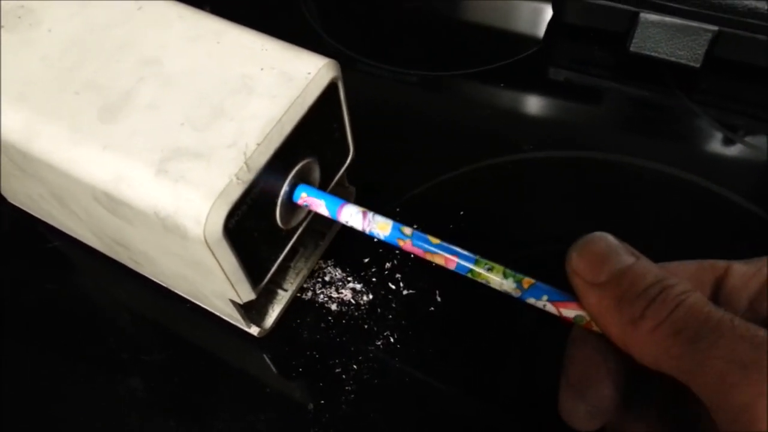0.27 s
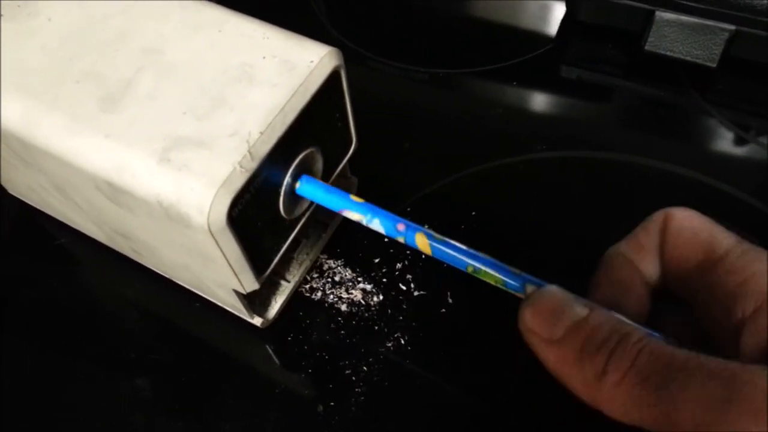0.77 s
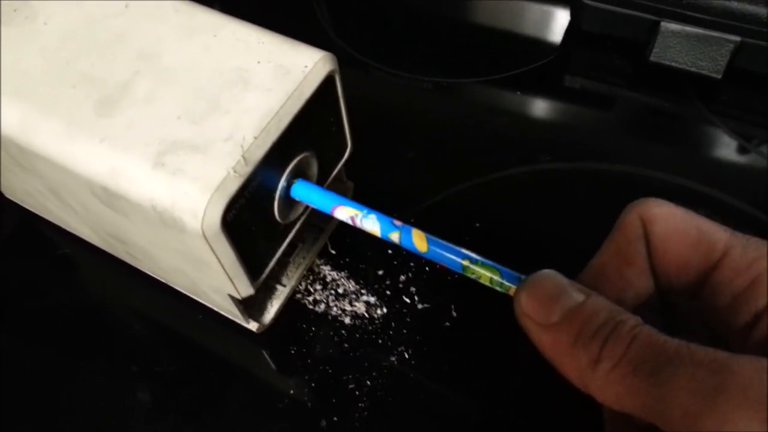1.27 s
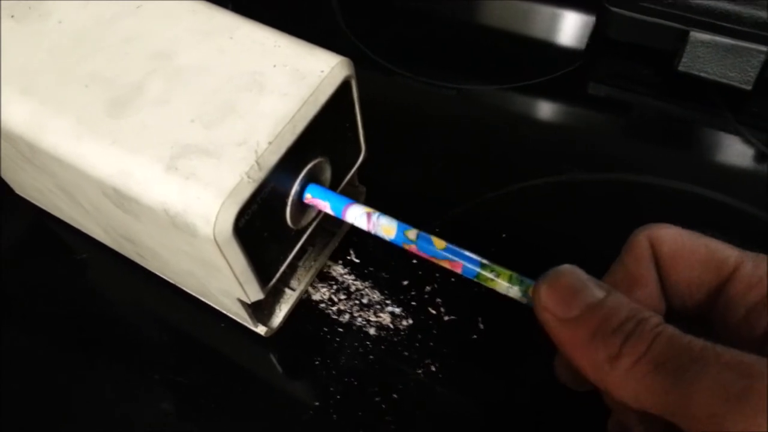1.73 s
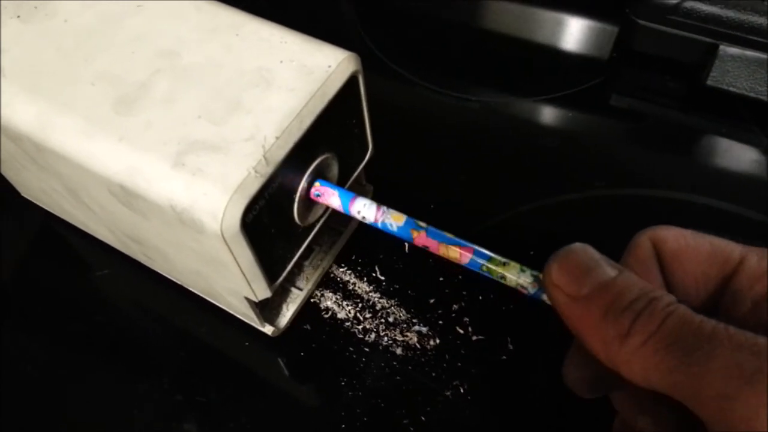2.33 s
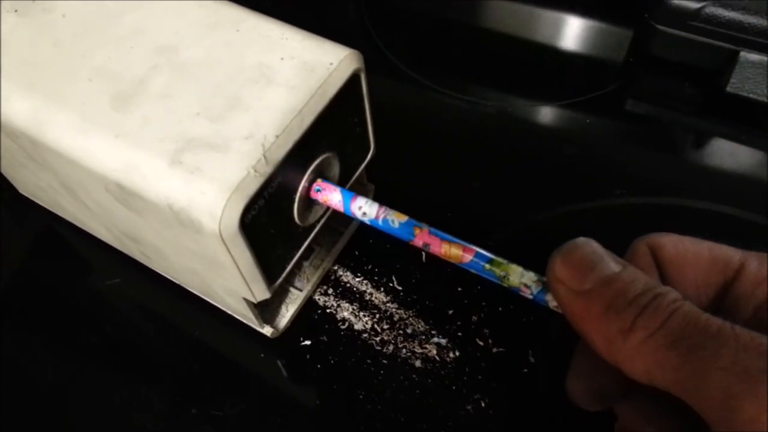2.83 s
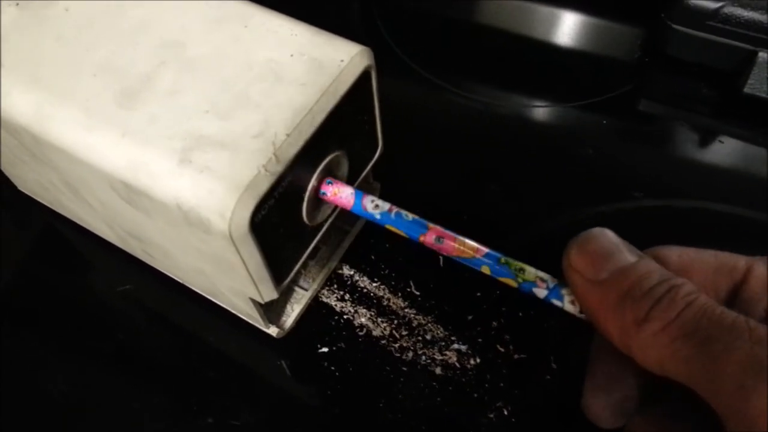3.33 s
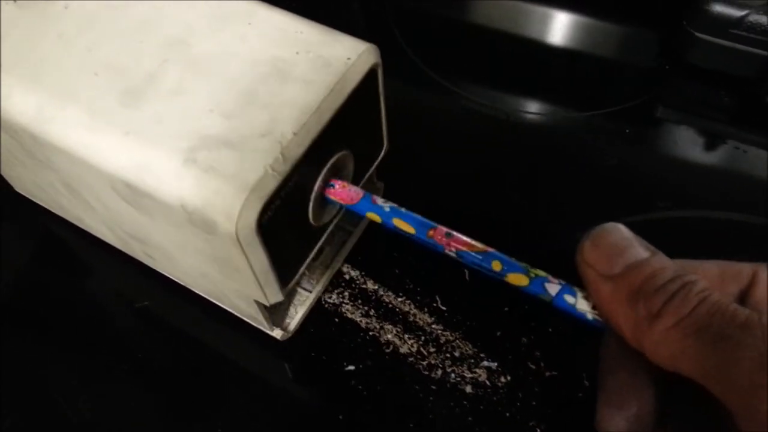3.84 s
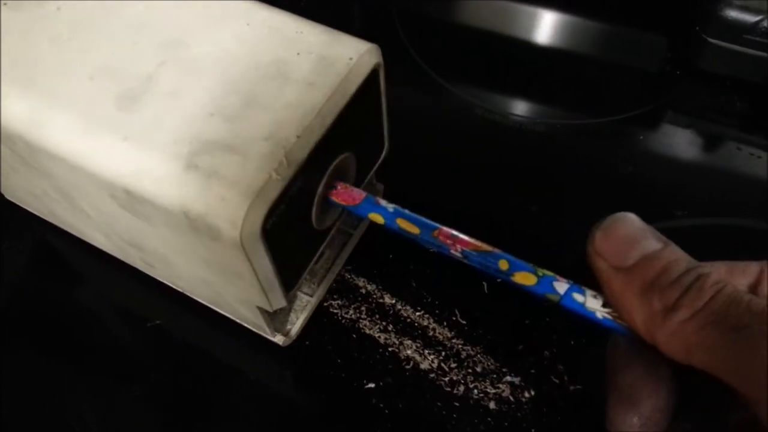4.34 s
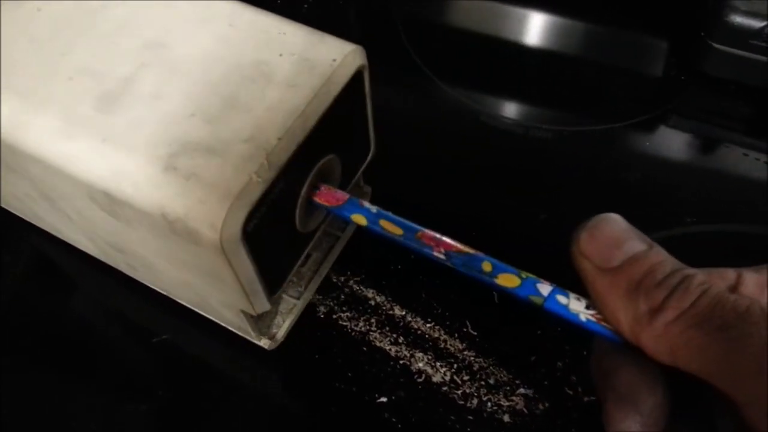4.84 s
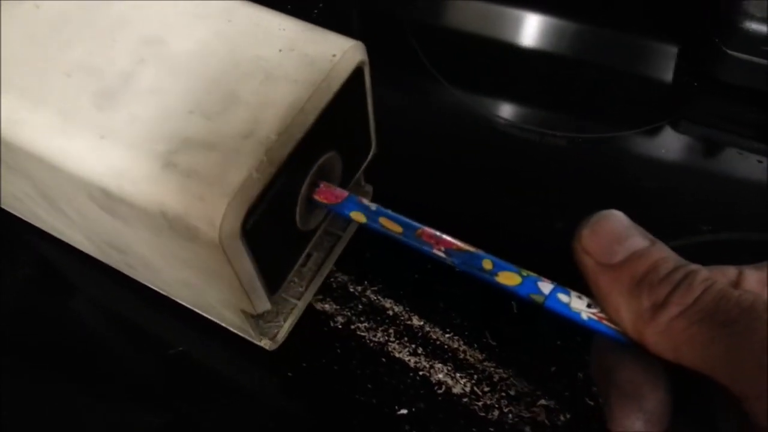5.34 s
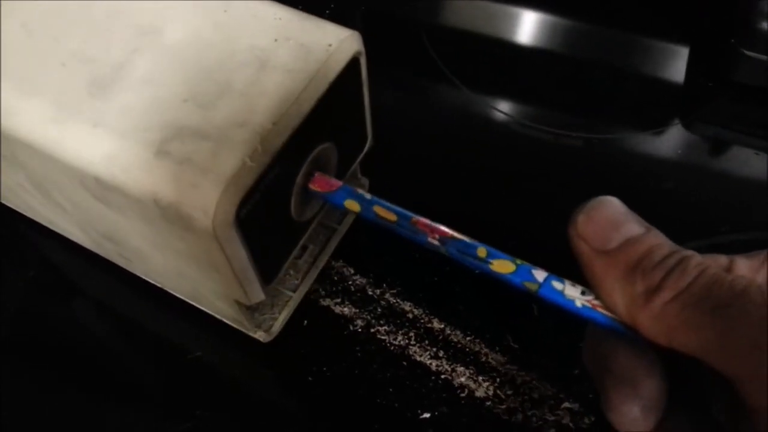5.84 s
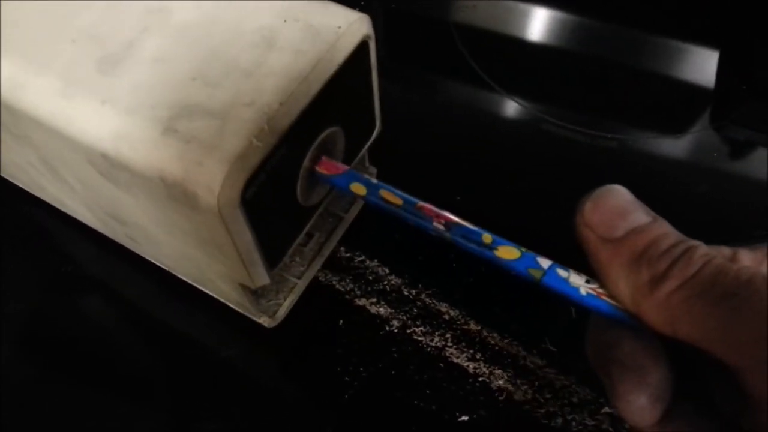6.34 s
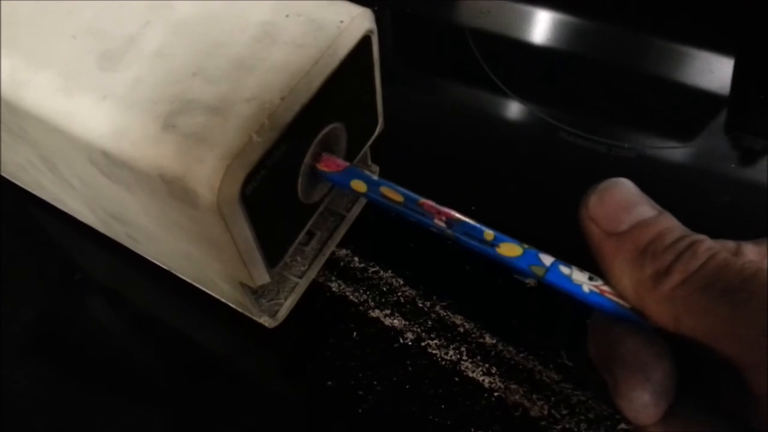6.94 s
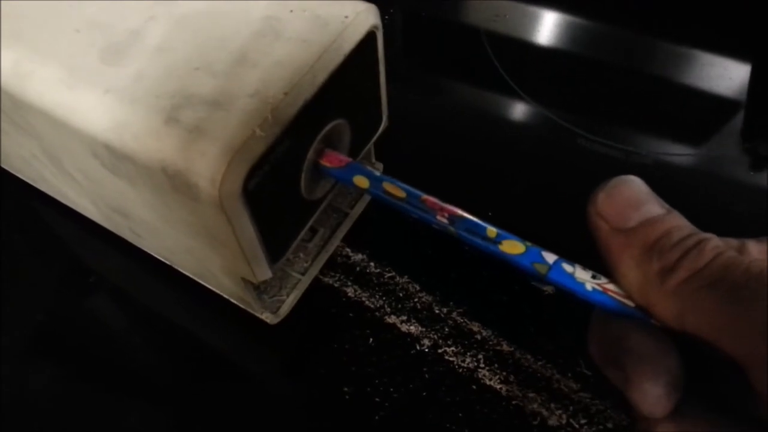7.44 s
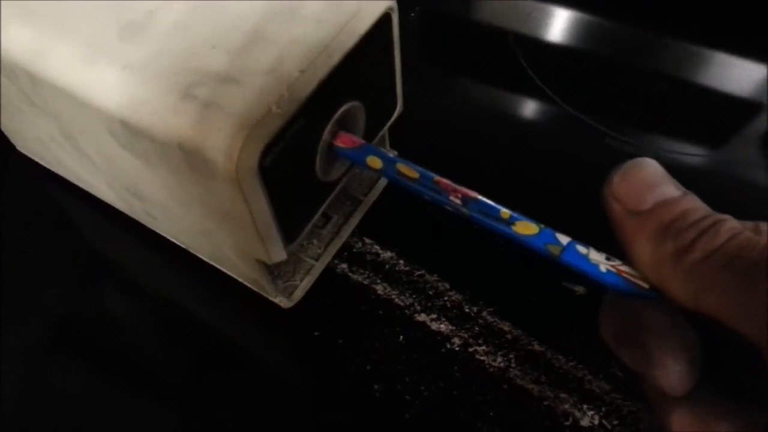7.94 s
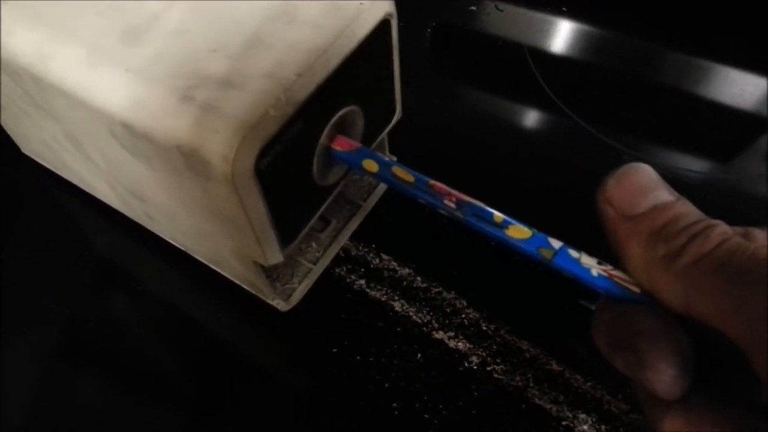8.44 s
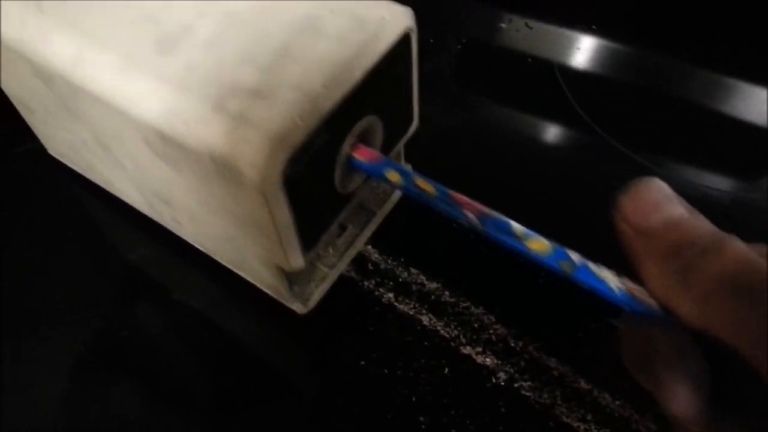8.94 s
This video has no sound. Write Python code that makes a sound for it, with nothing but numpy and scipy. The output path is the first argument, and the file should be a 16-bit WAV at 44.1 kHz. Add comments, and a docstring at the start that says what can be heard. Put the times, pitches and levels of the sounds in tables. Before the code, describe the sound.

An electric pencil sharpener grinds a pencil on a counter top, close to a stereo microphone, for a little over nine seconds. It is running from the start, its cutter pulsing about eight times a second. The blades shave the wood with a grainy, hissing rasp and a thin steel ring, while gear knocks make the plastic case drone and growl over a very faint motor hum. Blades catch harder now and then, notably around 1.5 and 2.3 seconds and repeatedly between 6 and 8.5 seconds. Rubbing parts add wavering, throbbing tones: lower chatter between about 2 and 5 seconds, a higher one from about 3 to 7, and a faint, thin squeal from 7 to 9. At about 9 seconds the pencil is drawn back and gives a short, bright scrape against the metal guide while the machine still turns.

```python
"""An electric pencil sharpener on a counter top, close to a stereo microphone, a pencil held in it.
From the start the cutter goes round eight times a second: the blades bite, rasp along the wood and let
go, while gear knocks and grinding ring the plastic case over a faint motor hum. As it runs on, a blade
now and then catches harder and rubbing parts chatter in short tones. At about nine seconds the pencil
is drawn back and scrapes the guide."""
import sys
import numpy as np
from scipy import signal
from scipy.fft import rfft, irfft, next_fast_len
from scipy.io import wavfile

SR = 44100
rng = np.random.default_rng(int(sys.argv[2]) if len(sys.argv) > 2 else 0)


def dump(signal):
    """Clip the signal to [-1, 1] and save it as 16-bit WAV at the path in sys.argv[1]."""
    limited = np.clip(np.atleast_2d(signal).T, -1, 1)
    pcm = np.round(limited * 32767).astype(np.int16)
    wavfile.write(sys.argv[1], SR, pcm)


N = 405719
TIME = np.arange(N) / SR


def plastic_case(turns, knocks, drive_db, feed_db, grind_db):
    """Gear knocks and grinding ring the case in four registers: boom, drone, growl and crunch."""
    # case resonances, low to high: f/Hz, width/Hz, level/dB, left-right/dB, change/(dB/s),
    # swing over a turn/dB, loudest point/turns
    boom = [(158.6, 36, -44, 0, 0.78, -0.7, 0.4), (230.5, 15.45, -50.5, -13, 2.5, -2, 0.14),
            (274.8, 28, -29, -1.5, 0.2, 0.5, 0.97), (301, 28, -38, 1.2, -1.0, -3.3, 0),
            (345.4, 71, -33, -2.5, 0.9, 2.4, 0.76), (447, 103, -36.5, 12, 1.16, 0.7, 0.5)]
    drone = [(553, 46, -24.5, -5, -0.42, 0.44, 0.33), (570.7, 96, -20, -7.5, 0.34, 0.54, 0.1),
             (641.5, 74, -26, 0.5, 0.14, 1.3, 0.1)]
    growl = [(699, 82, -24.5, 1, -1.14, 2.4, 0.17), (783, 75, -18.5, -4, -0.32, 1.4, 0.69),
             (851.6, 46.4, -19, -2, -0.06, 0.74, 0.17), (943.5, 51, -23, -5, 0.57, 2.3, 0.16),
             (1014.4, 45, -20.5, 0, 0.21, 0.96, 0.95), (1061, 45, -26.5, 6.5, 0.032, 2.1, 0.49)]
    crunch = [(1249, 170, -22.5, -6.5, 0.63, 0.2, 0.81), (1309, 68, -29, -13.5, -0.54, 0.2, 0.87),
              (1430, 109, -21.5, -13.5, 0.45, 1, 1), (1571, 57, -25, 3, -0.15, 1.0, 0.57),
              (1682, 184, -24.5, -15, 0.054, 0.37, 0.4), (1781, 86, -26.5, -2.5, -0.35, 0.94, 0.14),
              (1884, 174, -28, 1, -0.027, 0.33, 0.28), (2082, 194, -33.5, 2, -0.32, 0.32, 0.51)]
    # slow swells of the two low registers: t/s, level/dB
    boom_level = [(0.0, 4.5), (0.4, 4), (0.8, 4.5), (3.1, 1.8), (4.1, 0), (4.5, 1), (5.7, 3), (6.3, -1.5),
                  (7.0, 2.5), (7.6, -1), (8.0, 1.5), (8.4, -1), (8.8, -0.5), (9.2, -4.5)]
    drone_level = [(0.0, 1.5), (0.4, -1), (3.4, -1.8), (3.8, 2.7), (4.2, -0.2), (5.1, 0.5), (5.8, -2.3),
                   (7.8, 1.5), (8.2, -0.5), (8.6, 5.5), (9.2, -1.5)]
    boom_db, drone_db, growl_db, crunch_db = drive_db
    fade_db = -0.09 * (TIME - TIME[-1] / 2)   # less growl as the point takes shape
    growl_db = growl_db + 0.2 * feed_db + fade_db + grind_db
    crunch_db = crunch_db + 0.085 * feed_db + grind_db
    case = from_db(boom_db + swell(boom_level)) * ringing(boom, turns, knocks, knock_share=0.21)
    case += from_db(drone_db + swell(drone_level)) * ringing(drone, turns, knocks, knock_share=0.26)
    case += from_db(growl_db) * ringing(growl, turns, knocks, knock_share=0.22)
    case += from_db(crunch_db) * ringing(crunch, turns, knocks, knock_share=0.39)
    return case


def blade_strokes(turns):
    """Each turn the blades run free, then bite three times: dB of boom, drone, growl, crunch, rasp."""
    # the three bites: start/turns, rise/turns, then lift/dB of boom, drone, growl, crunch, rasp
    strokes = [(0.143, 0.084, 4, 4, -0.5, 6, 5.5), (.47, 0.085, 3.5, 5.5, 2.5, 1.1, -0.4),
               (.77, .13, 5.5, 2.5, 0.5, 2.5, 2.5)]
    idle_db = (-4, -4.5, -0.83, -2.42, -1.48)   # between strokes
    free_db, free_at_turn, free_width_turns = (-7, -5, -5, -5, -3), 0.11, 0.038
    grain_spread_db = (1.5, 1.15, 0.26, 0.26, 0.32)   # the wood's grain makes every turn different
    count = int(turns[-1]) + 2
    free_turn, free_phase = np.divmod(turns - free_at_turn + .5, 1)
    free = np.exp(-((free_phase - .5) / free_width_turns) ** 2)
    depth = 1 + 0.37 * rng.standard_normal(count)
    jolts = np.outer(free_db, depth[free_turn.astype(int)] * free)
    for start, rise, *lifts_db in strokes:
        turn, phase = np.divmod(turns - start, 1)
        age = phase / rise
        strength = 1 + 0.11 * rng.standard_normal(count)
        jolts += np.outer(lifts_db, strength[turn.astype(int)] * age * np.exp(1 - age))
    bluntness = 0.14 * np.exp(-TIME / 0.6)   # a pencil jolts more while it is blunt
    jolts += bluntness * (jolts - jolts.mean(axis=1, keepdims=True))
    base_db = rng.standard_normal((count, len(idle_db))) * grain_spread_db + idle_db
    return jolts + [np.interp(turns, np.arange(count) + .5, part) for part in base_db.T]


def gear_knocks(turns, per_turn, slack, uneven_db):
    """Loose gear teeth knock in step with the rotation, each a little off in time and strength."""
    teeth = np.arange(turns[0] * per_turn, turns[-1] * per_turn).round()
    late, strength = rng.standard_normal((len(teeth), 2)).T
    at = np.interp((teeth + slack * late) / per_turn, turns, np.arange(N)).astype(int)
    knocks = np.zeros(N)
    knocks[at] = from_db(uneven_db * np.tanh(strength)) * rng.choice([-1, 1], len(teeth))
    return rms_one(knocks)


def catches(rise_s):
    """Grinding and rasp jump as a blade catches or snags, and a few times dip briefly; both in dB."""
    # brief changes, mostly hard catches, also a few short dips: t/s, grinding/dB, rasp/dB
    brief_changes = [(0.076, 2, 2.5), (0.197, 5, 3.5), (0.436, 0.5, 0.5), (0.678, 0, -1), (0.803, 4, 2),
                     (0.927, 0, -3), (1.293, -0.5, 1.5), (1.417, 4.5, 2), (1.54, 7.5, 1), (2.231, 5.5, 3),
                     (2.338, 5, 4), (2.771, 4, 6), (3.048, 2.5, 5.5), (4.007, 2, 4.5), (4.493, 1.5, 2),
                     (4.634, 1, 4.5), (5.058, 1, 0), (6.287, 4, 6.5), (6.771, 4.5, 4), (7.163, 5, 6),
                     (7.512, 3, 6), (7.573, 1.5, 3.5), (7.699, 2.5, 4), (7.899, 2, 5), (8.022, 6.5, 5.5),
                     (8.315, 4, 2), (8.357, 2, 4.5), (8.452, 5.5, 5.5), (8.816, -2, 4), (8.974, 2.5, 8.5)]
    snags_per_s, snag_rise_s, snag_decay_s, snag_lifts_db = 5.8, 0.0014, 0.015, (2.5, 5)
    lifts = np.zeros((2, N))
    for start, grind_db, rasp_db in brief_changes:
        near = (TIME > start) & (TIME < start + 10 * rise_s)
        age = (TIME[near] - start) / rise_s
        lifts[:, near] += np.outer([grind_db, rasp_db], age * np.exp(1 - age))
    age = TIME[:SR // 10]
    snag = (1 - np.exp(-age / snag_rise_s)) * np.exp(-age / snag_decay_s)
    snags = signal.oaconvolve(rng.random(N) < snags_per_s / SR, snag / snag.max())[:N]
    return lifts + np.outer(snag_lifts_db, np.tanh(snags))


def chatter(turns, fade_s):
    """Stick and slip feeds one resonance at the same place of every orbit: a wavering, nearly pure tone."""
    # stretches of rubbing, silent unless the end follows the start:
    # start/s, end/s, f/Hz, wander/Hz, level/dB, loudest point/turns, throb depth/dB
    stretches = [(2.05, 3.7, 274.4, 5.2, -22.5, 0.74, 20), (4.22, 5.2, 273.8, 4.64, -19, 0.78, 37),
                 (0, 7.9, 539.4, 14.7, -23, 0.6, 20), (0, 3, 783, 16, -18, 0.35, 24),
                 (2.7, 7.3, 1063, 16.2, -17, 0.68, 26), (3.599, 6.2, 4500, 35, -52, .42, 24),
                 (5.0, 4.1, 5990, 30, -35, 0.54, 40), (6.8, 8.9, 6006, 43, -33, 0.23, 45)]
    out = np.zeros((2, N))
    for start, end, hz, wander_hz, level_db, loudest, depth_db in stretches:
        pitch_hz = hz + wander_hz * drift(25.0)
        tone = np.sqrt(2) * np.sin(2 * np.pi * np.cumsum(pitch_hz) / SR)
        gate = np.clip(np.minimum(TIME - start, end - TIME) / fade_s, 0, 1)
        throb_db = -depth_db * np.sin(np.pi * (turns - loudest)) ** 2
        out += tone * gate * from_db(level_db + throb_db + 1.3 * drift(0.64))
    return out * from_db([[-1.2], [1.2]])


def shaving(cut, grain_db, grain_rate, snap_rate, snap_db, snap_s):
    """Wood fibres tear in a grainy hiss with snapping chips; fine dust hisses higher and more evenly."""
    # the rasping hiss as the microphone colours it, with a bright bump near 10 kHz:
    # f/Hz, density/(dB per Hz), left-right/dB
    rasp = [(2224, -54.5, 12), (2303, -59.5, 4.5), (3400, -65.5, 15), (4200, -62, 8), (4900, -68.5, 5),
            (5400, -66.5, 3.5), (6320, -72, -1), (7300, -68.5, -2.5), (9000, -71.5, -6),
            (10000, -68.5, -12), (11200, -69, -11.5), (12640, -77.5, -8), (14100, -92.5, 6)]
    dust_above_hz, low_cut_hz = 6500., 2200
    size = next_fast_len(N)
    hz = np.arange(size // 2 + 1) * SR / size
    snaps = (rng.random(N) < snap_rate / SR) * rng.random(N)
    snaps = signal.lfilter([1], [1, -np.exp(-1 / (snap_s * SR))], snaps)
    force = from_db(grain_db * drift(grain_rate)) + from_db(snap_db) * snaps
    fibres = cut * rms_one(force * rng.standard_normal((2, N)))
    dust_force = force ** 0.88 * from_db(0.48 * drift(90))
    dust = cut ** 0.96 * rms_one(dust_force * rng.standard_normal((2, N)))
    fibres = drawer(fibres, t60=0.043, wet_db=-6.5)
    dust_share = hz ** 4 / (hz ** 4 + dust_above_hz ** 4)
    mid, side = np.sqrt(1 - dust_share) * rfft(fibres, size) + np.sqrt(dust_share) * rfft(dust, size)
    density_db, pan_db = at_hz(rasp, hz)
    low_cut = 1 - 1 / (1 + (hz / low_cut_hz) ** 12)
    spectrum = stereo(mid, side, hz, pan_db) * from_db(density_db) * low_cut
    return irfft(spectrum, size)[:, :N] * np.sqrt(SR / 2)


def steel_cutter(cut, turns, knocks):
    """The steel cutter rings high, louder the harder it cuts."""
    # cutter resonances: f/Hz, width/Hz, level/dB, left-right/dB, change/(dB/s),
    # swing over a turn/dB, loudest point/turns
    modes = [(2710, 55, -36.5, -1.5, 0.31, 1.8, 0.53), (3566, 72, -42, -8, 0.018, 4.2, 0.75),
             (3733, 94, -38.5, 19, -0.34, 2.4, 0.51), (3950, 80, -47, 2, 1, 2, .4),
             (4380, 40, -70, -5, 1, 3.1, 0.4), (6000, 130, -45.5, -2, 0.65, 5.3, .25),
             (6680, 81, -46, -31, 0.31, 7.2, 0.2)]
    return cut * ringing(modes, turns, knocks, knock_share=0.11)


def guide_scrapes(t60):
    """Lacquered wood rubs the metal guide, short and bright, as the pencil is drawn back."""
    # rubs on the guide: t/s, level/dB
    rubs = [(8.975, -38), (9.028, -40), (9.097, -16)]
    level = np.zeros(N)
    for start, db in rubs:
        level += (TIME > start) * from_db(db - 60 * np.clip((TIME - start) / t60, 0, 2))
    return level * band(rng.standard_normal((2, N)), hz=9600, width_hz=4500)


def drawer(x, t60, wet_db):
    """Dense short reflections in the shavings drawer, different to left and right."""
    age = TIME[:SR // 20]
    echoes = rng.standard_normal((2, len(age))) * from_db(-60 * age / t60)
    echoes *= from_db(wet_db) / np.linalg.norm(echoes, axis=1, keepdims=True)
    echoes[:, 0] += 1   # direct sound
    return signal.fftconvolve(x, echoes, axes=1)[:, :N] / np.sqrt(1 + from_db(2 * wet_db))


def motor():
    """Faint mains hum."""
    return from_db(-62) * np.sin(2 * np.pi * 120 * TIME)


def rumble():
    """A faint, uneven low rumble around 85 Hz."""
    return from_db(-65 + 3.6 * drift(9.1)) * band(rng.standard_normal((2, N)), hz=85, width_hz=120)


def ringing(modes, turns, knocks, knock_share):
    """Shared knocks and each mode's own friction noise ring resonances that swell as the cutter orbits."""
    out = np.zeros((2, N))
    scattered = rng.standard_normal((2, N))
    for k, (hz, width_hz, level_db, pan_db, change_db, swing_db, loudest) in enumerate(modes):
        drive = np.sqrt(knock_share) * knocks + np.sqrt(1 - knock_share) * rng.standard_normal(N)
        sound = stereo(band(drive, hz, width_hz), band(scattered[k % 2], hz, width_hz), hz, pan_db)
        orbit_db = swing_db * np.cos(2 * np.pi * (turns - loudest))
        out += sound * from_db(level_db + orbit_db + change_db * (TIME - TIME[-1] / 2))
    return out


def stereo(mid, side, hz, pan_db):
    """Mix mid and side by the channels' likeness at this pitch, then pan at constant power."""
    # likeness of left and right at the microphone: f/Hz, correlation/0-1
    likeness = [(150, 0.88), (280, 1), (550, 0.94), (1000, 0.98), (1400, 0.58), (2000, 0.93), (3500, 0.03),
                (12000, 0.08)]
    alike, = at_hz(likeness, hz)
    mid, side = np.sqrt((1 + alike) / 2) * mid, np.sqrt((1 - alike) / 2) * side
    ratio = from_db(pan_db)
    return np.array([(mid + side) * ratio, mid - side]) * np.sqrt(2 / (1 + ratio ** 2))


def band(x, hz, width_hz):
    """A steep-sided resonance; unit rms."""
    low = np.sqrt(hz ** 2 + (width_hz / 2) ** 2) - width_hz / 2
    sos = signal.butter(2, [low, low + width_hz], "band", fs=SR, output="sos")
    return rms_one(signal.sosfilt(sos, x))


def drift(rate):
    """A smooth random wander of unit rms that changes about rate times a second."""
    pole = np.exp(-20 * np.pi * rate / SR)
    noise = rng.standard_normal(N // 10 + 4002)
    slow = signal.lfilter([1], [1, -2 * pole, pole * pole], noise)[4000:]
    return np.interp(np.arange(N) / 10, np.arange(len(slow)), rms_one(slow))


def swell(rows):
    """A slow level curve in dB about its own mean."""
    db = over_time(rows)
    return db - db.mean()


def over_time(rows):
    """Points of (t/s, value) joined by straight lines."""
    return np.interp(TIME, *np.transpose(rows))


def at_hz(rows, hz):
    """Every column of a spectrum, joined on a log-frequency axis."""
    first, *columns = np.transpose(rows)
    return [np.interp(np.log(hz + 1e-9), np.log(first), column) for column in columns]


def from_db(db):
    """Decibels to gain."""
    return 10 ** (np.asarray(db) / 20)


def rms_one(x):
    """Scale to unit rms."""
    return x / np.sqrt(np.mean(x ** 2) + 1e-20)


def scene():
    """The sharpener from close by: the turning cutter sets the rhythm of case and blades."""
    # rotation of the cutter carrier: t/s, angle/turns
    rotation = [(-.074, 0), (.534, 5), (.908, 8), (1.395, 12), (2.144, 18), (2.776, 23), (3.398, 28),
                (4.408, 36), (5.923, 48), (6.417, 52), (8.303, 67), (9.3, 75)]
    # how hard the hand feeds the pencil: t/s, rasp level/dB
    feed = [(0.0, 1.3), (1.0, 0.1), (1.4, 0.9), (2.3, -1.1), (3.1, 0.6), (4.8, -1.9), (5.2, 1), (5.8, -0.5),
            (6.9, -0.4), (7.9, 0.5), (8.3, 0.5), (9.2, 1.5)]
    # the machine's place in front of the microphone: t/s, left-right/dB
    place = [(0, -.9), (5.8, 0), (8, 1.4), (9.2, 1.5)]
    turns, feed_db, place_db = over_time(rotation), swell(feed), over_time(place)
    *case_db, rasp_db = blade_strokes(turns)
    knocks = gear_knocks(turns, per_turn=14, slack=0.1044, uneven_db=3.5)
    grind_lift, rasp_lift = catches(rise_s=0.0061)
    judder = drift(46)   # the pencil shakes in the guide
    cut = from_db(rasp_db + feed_db + rasp_lift + 0.84 * judder)
    case = plastic_case(turns, knocks, case_db, feed_db, grind_db=grind_lift + 0.99 * judder)
    case += chatter(turns, fade_s=0.057)
    left_lag_s = .00012   # the body of the machine is nearer the microphone's right side
    case[0] = np.interp(TIME - left_lag_s, TIME, case[0])
    wood = shaving(cut, grain_db=1.2, grain_rate=620, snap_rate=52, snap_db=0.5, snap_s=0.0048)
    blades = from_db(-1.15) * wood + from_db(-3.8) * steel_cutter(cut, turns, knocks)
    mix = case + blades + guide_scrapes(t60=0.074) + motor() + rumble()
    return mix * from_db([place_db / 2, -place_db / 2])


def record(dry):
    """The loudest peaks flatten against full scale; the top is cut above 14.5 kHz."""
    squashed = dry / (1 + np.abs(dry / 1.02) ** 10) ** (1 / 10)
    return signal.sosfilt(signal.ellip(10, .1, 70, 14500, fs=SR, output="sos"), squashed)


dry = scene()
out = record(dry)
dump(out)
```